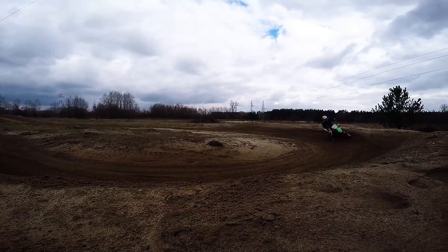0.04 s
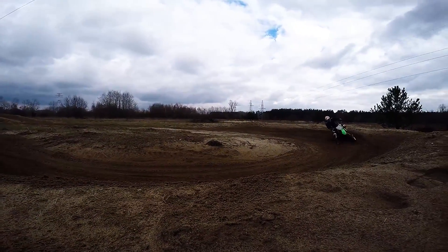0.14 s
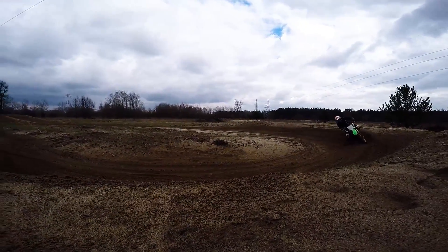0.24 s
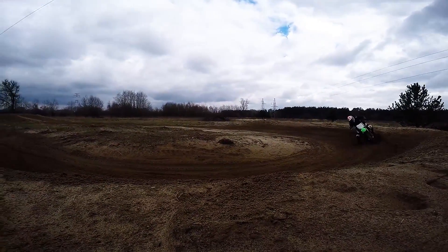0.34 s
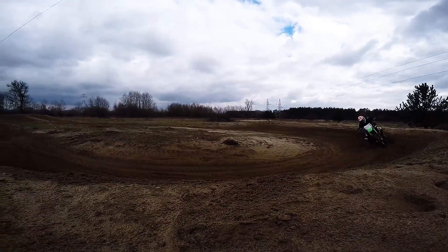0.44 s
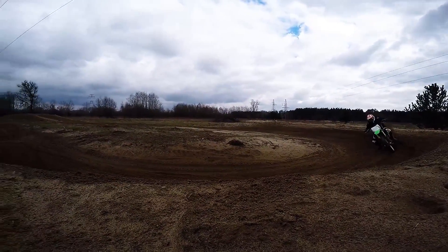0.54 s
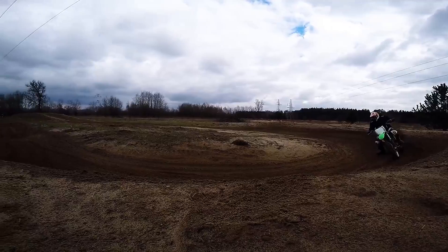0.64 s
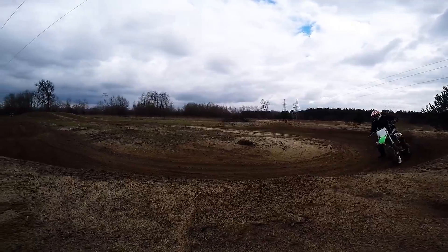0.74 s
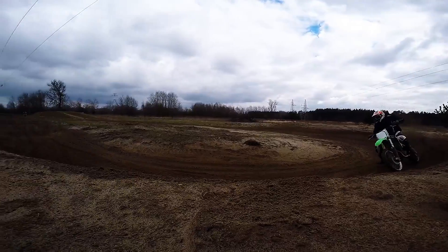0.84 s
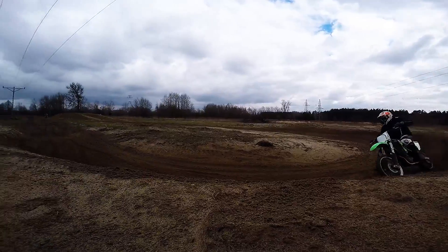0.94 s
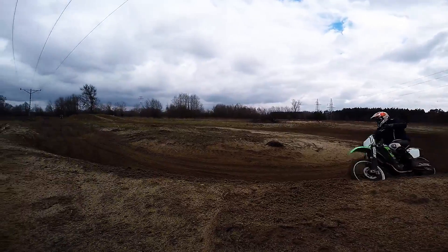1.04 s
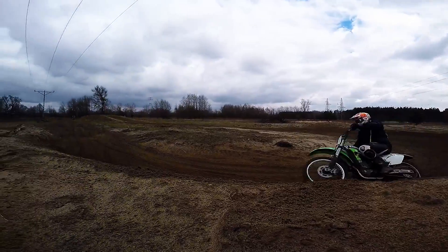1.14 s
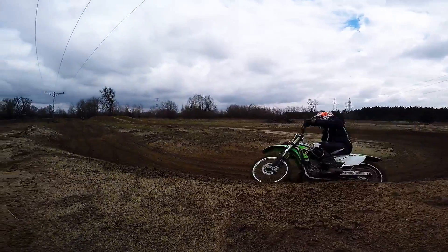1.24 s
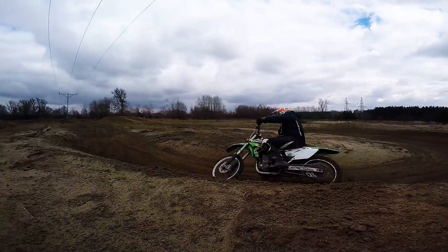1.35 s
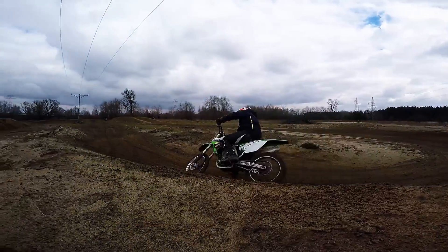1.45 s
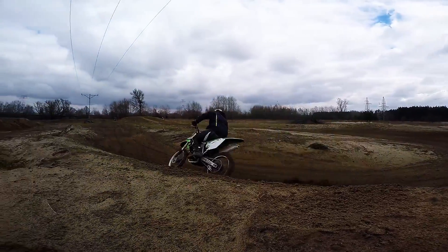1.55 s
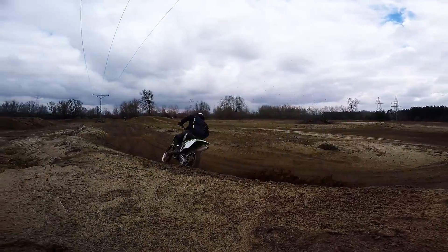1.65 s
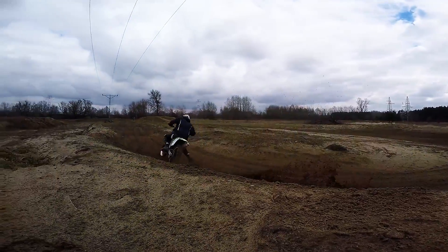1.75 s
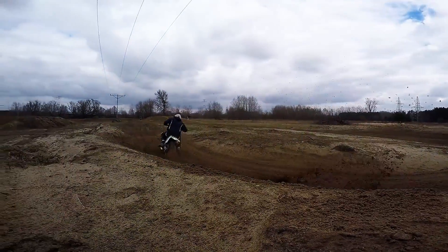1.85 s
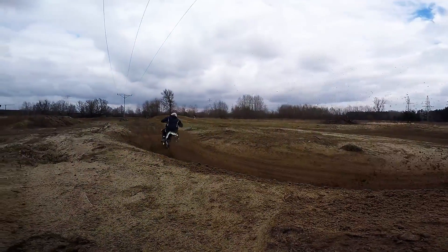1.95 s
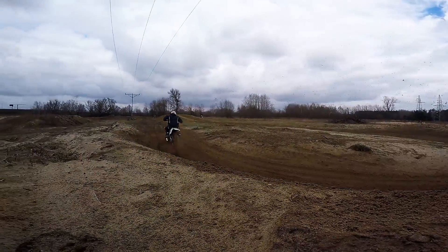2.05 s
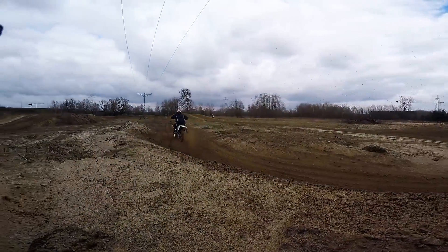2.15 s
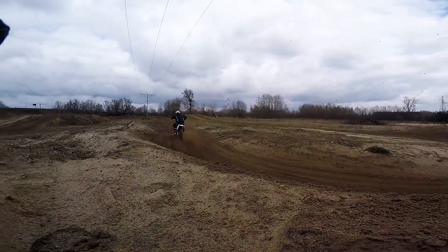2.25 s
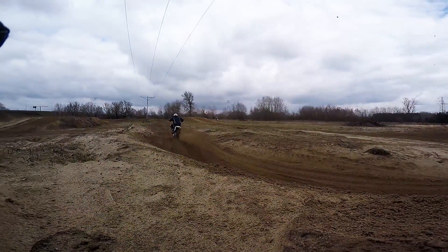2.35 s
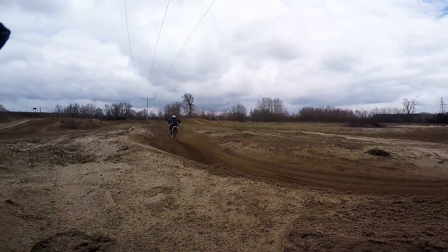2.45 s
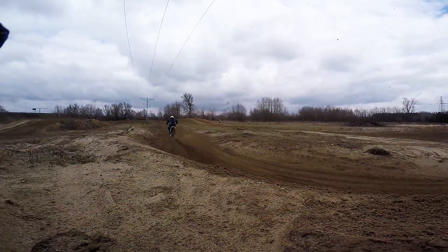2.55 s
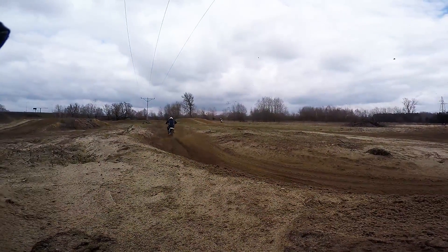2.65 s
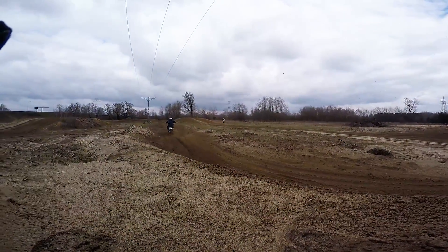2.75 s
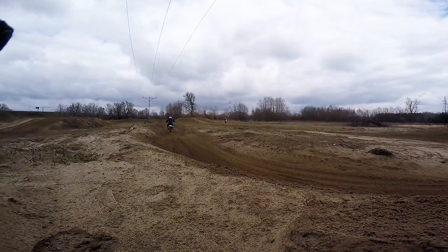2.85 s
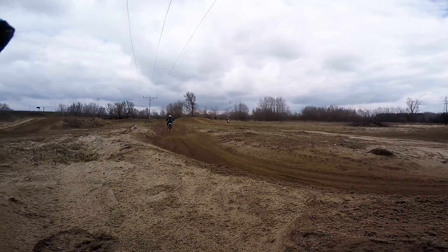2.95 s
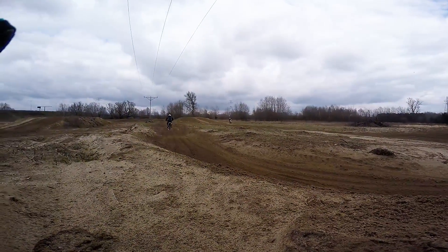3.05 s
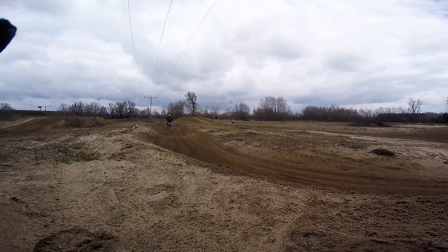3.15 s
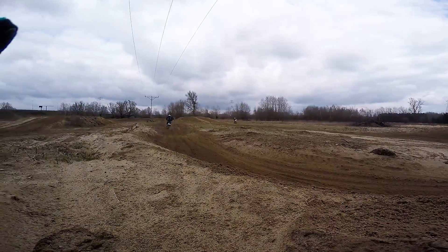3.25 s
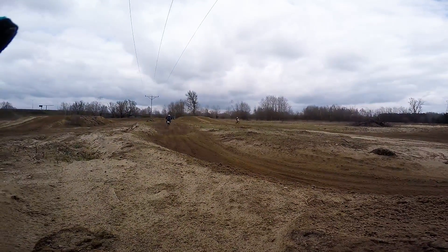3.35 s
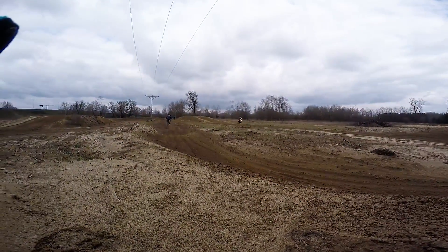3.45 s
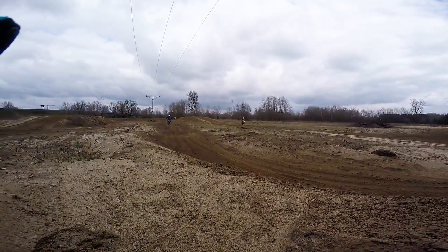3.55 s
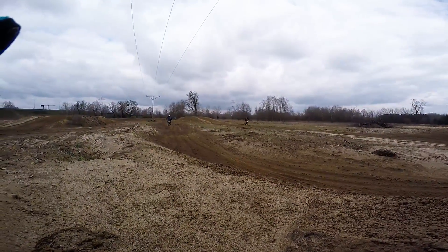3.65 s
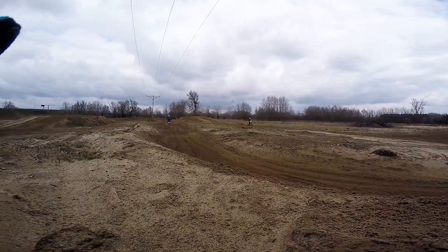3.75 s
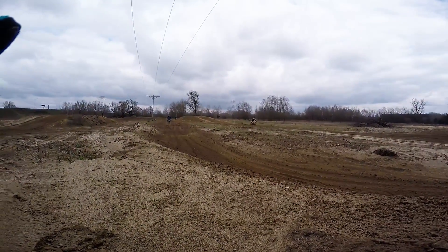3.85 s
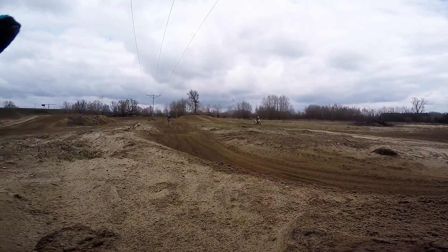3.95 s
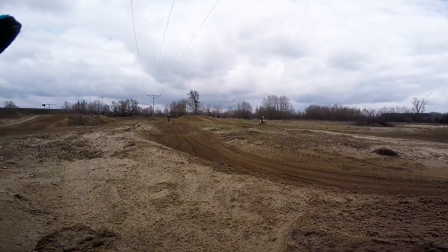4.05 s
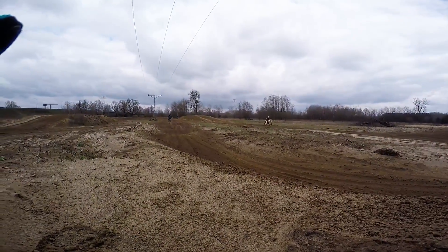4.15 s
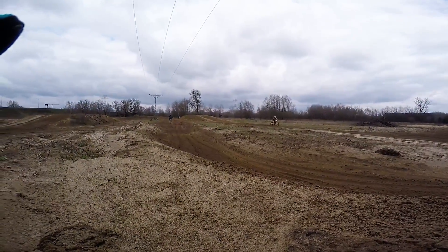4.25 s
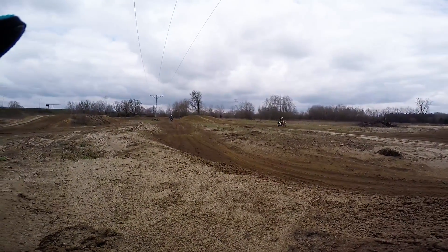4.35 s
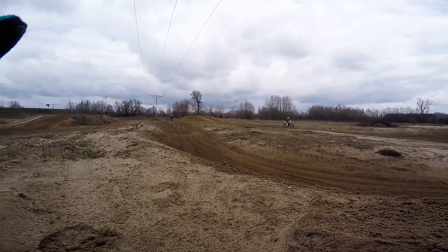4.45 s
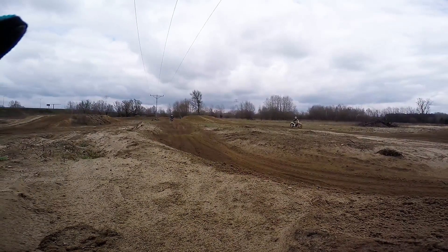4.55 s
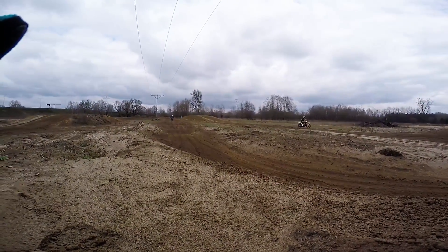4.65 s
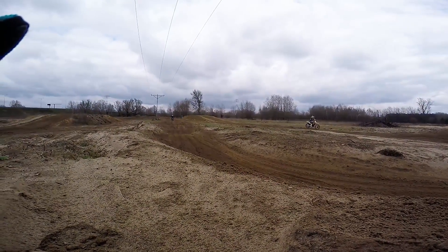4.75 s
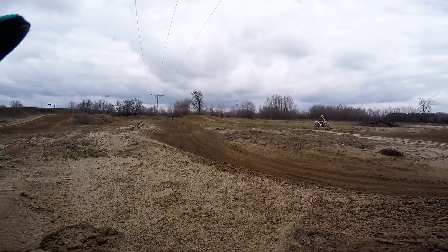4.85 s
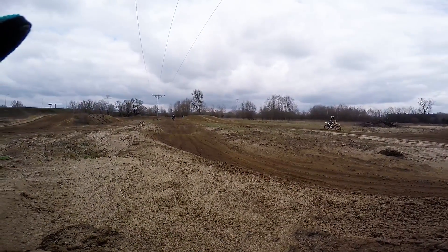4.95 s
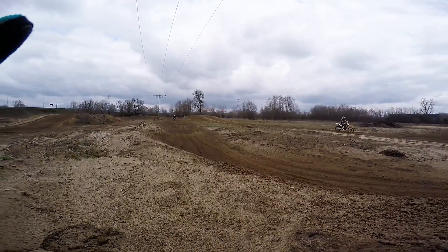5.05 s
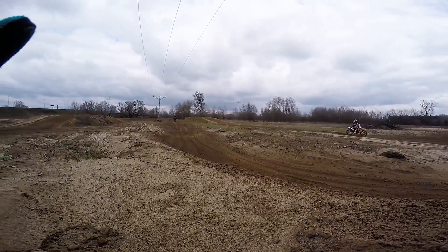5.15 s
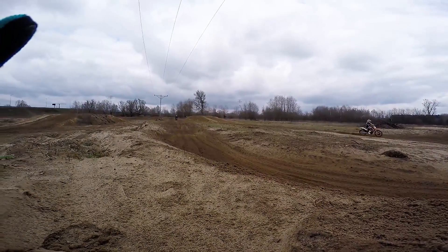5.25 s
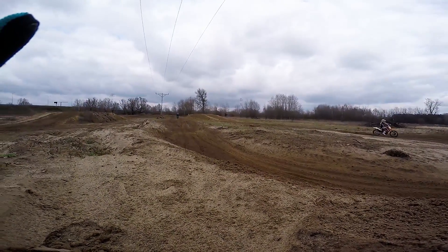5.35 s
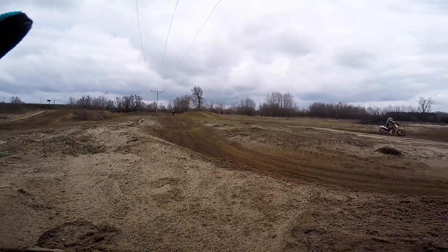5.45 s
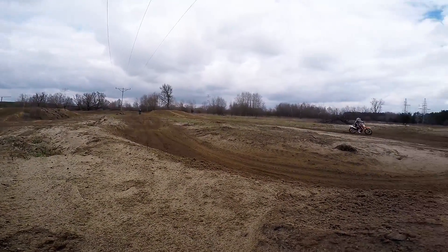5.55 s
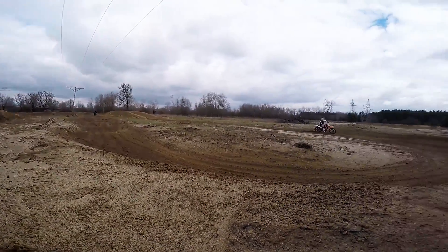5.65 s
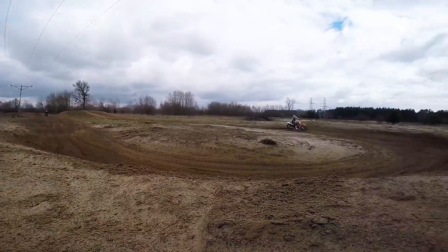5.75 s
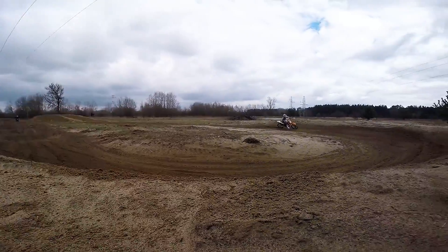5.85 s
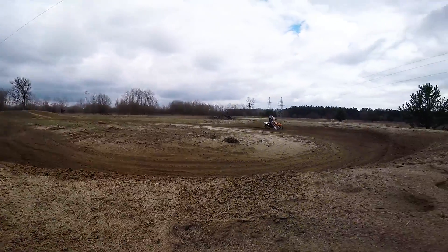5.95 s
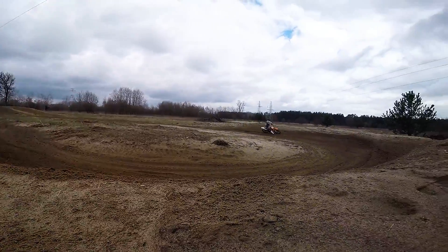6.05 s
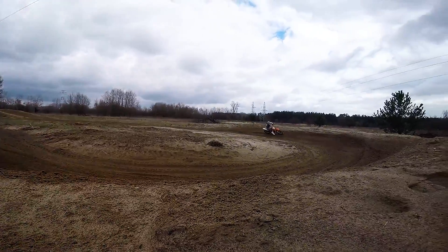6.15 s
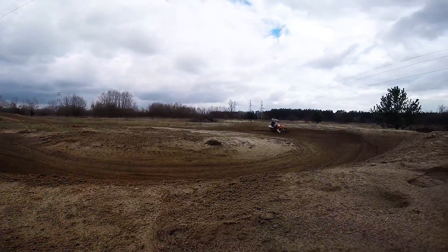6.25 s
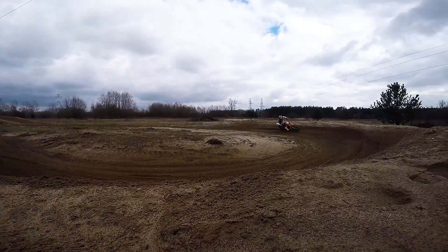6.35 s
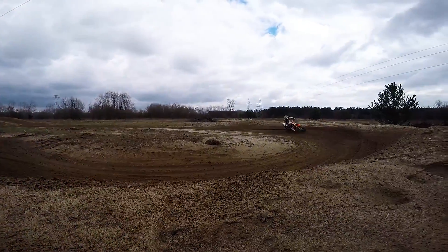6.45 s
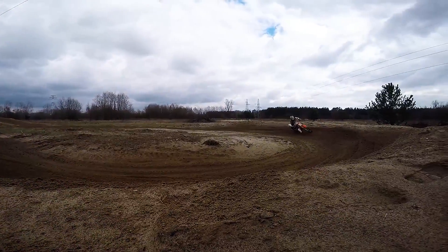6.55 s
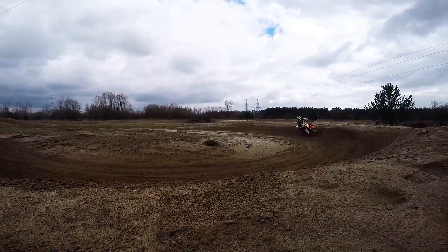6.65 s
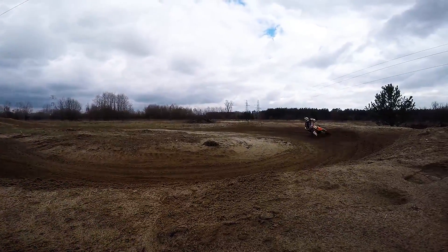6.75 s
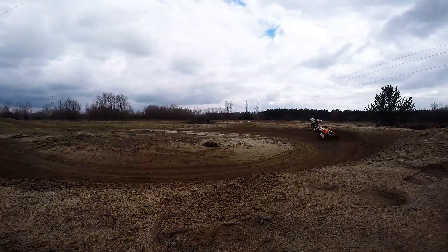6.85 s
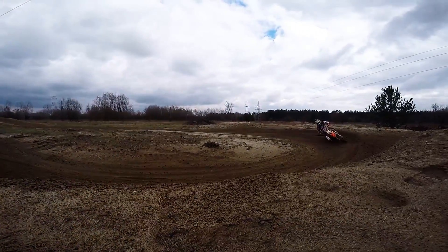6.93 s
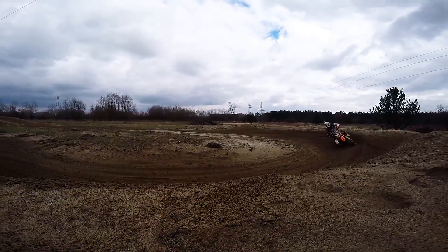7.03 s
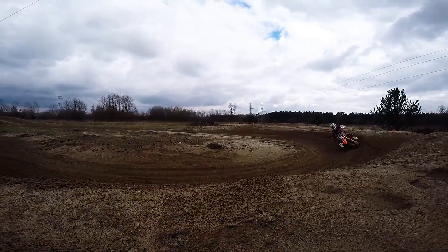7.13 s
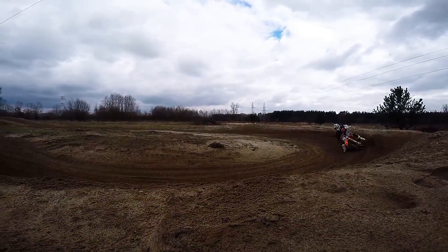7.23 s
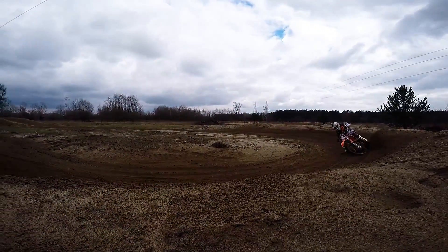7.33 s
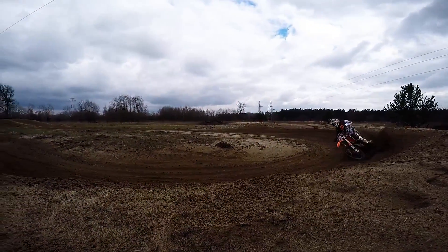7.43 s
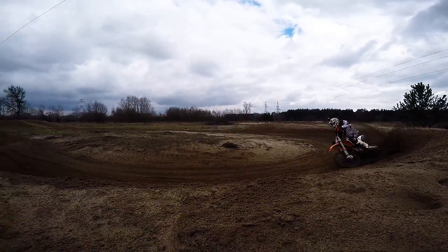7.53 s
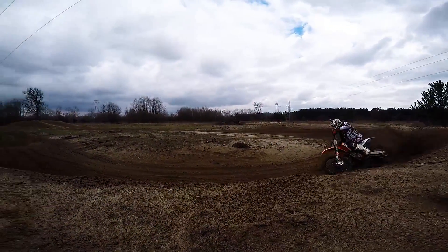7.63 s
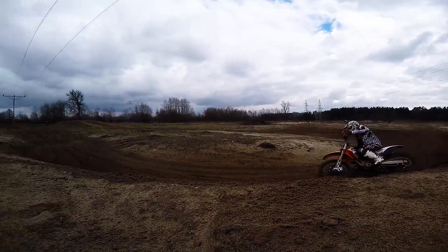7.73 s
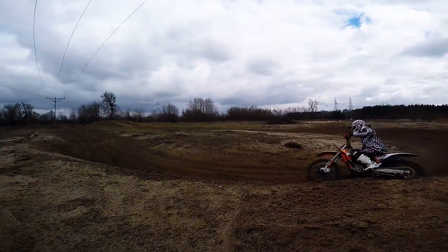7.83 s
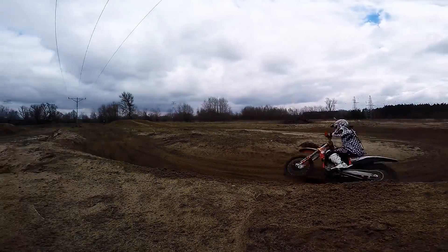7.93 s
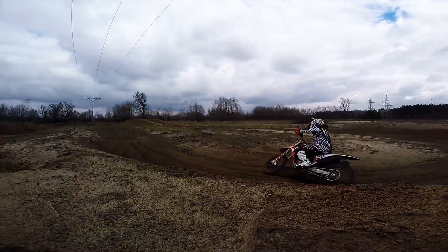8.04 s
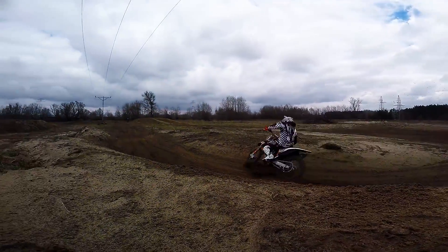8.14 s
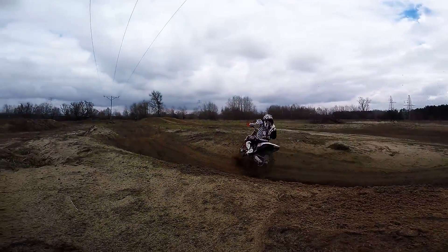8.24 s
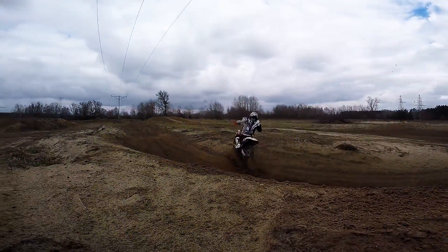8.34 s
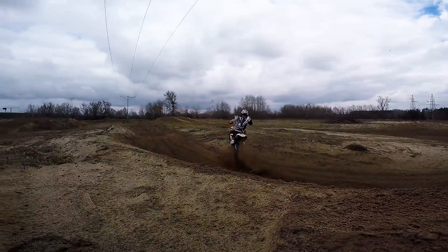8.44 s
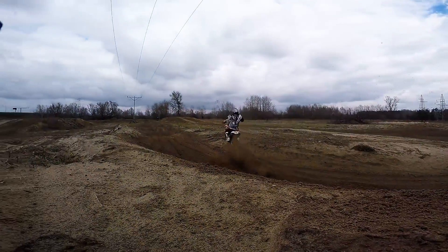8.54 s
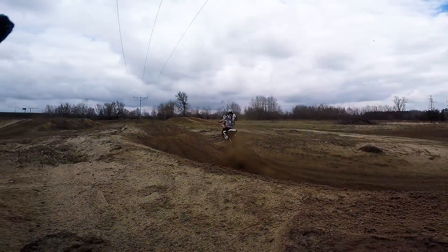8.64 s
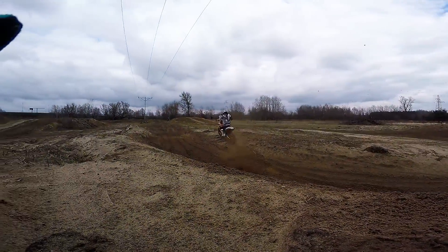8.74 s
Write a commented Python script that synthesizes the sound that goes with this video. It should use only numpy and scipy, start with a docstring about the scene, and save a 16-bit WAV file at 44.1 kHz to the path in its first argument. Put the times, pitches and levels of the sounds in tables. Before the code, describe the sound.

Two four-stroke dirt bikes roar past close by, one after the other on an open sandy track, blasting away with raspy, crackling exhaust surges.

```python
"""Two dirt bikes in a sandy bend

Two four-stroke bikes pass close by a camera, one after the other, and pull away. Head on, each is intake honk
and a noisy rush of chain, gears and tyres; tail on, every firing is a harmonic boom with a rasping burst of gas.
Surges of throttle set engine speed and loudness, and at listed moments the exhaust cracks as the load changes.
Filtered noise bursts are clods landing; pulse trains are far bikes; low noise is wind on the microphone."""
import sys
import numpy as np
from scipy import signal
from scipy.fft import rfft, irfft, next_fast_len
from scipy.io import wavfile
from scipy.ndimage import uniform_filter1d, map_coordinates

SR = 44100
rng = np.random.default_rng(int(sys.argv[2]) if len(sys.argv) > 2 else 0)


def waveform_to_disk(signal):
    """Save audio, clipped to [-1, 1], as 16-bit WAV at the path in sys.argv[1]."""
    frames = np.transpose(np.atleast_2d(signal))
    scaled = np.clip(frames, -1, 1) * 32767
    samples = np.round(scaled).astype(np.int16)
    wavfile.write(sys.argv[1], SR, samples)


N = 387638

# Throttle surges: (time [s], initial firing rate [Hz], climb [s], final firing rate [Hz], hold [s],
# full drop once eased off [dB])
FIRST_SURGES = [(0.14, 41.0, 0.27, 54.0, 0.01, 2.0), (0.66, 34.3, 0.26, 66.8, 0.08, 2.0),
                (1.35, 45.2, 0.28, 84.5, 0.02, 1.0), (1.97, 71.6, 0.23, 83.9, 0.1, 1.0),
                (2.49, 74.9, 0.13, 79.4, 0.03, 9.0), (2.79, 57.9, 0.08, 57.8, 0.08, 1.0),
                (2.96, 58.8, 0.17, 87.2, 0.17, 8.0), (3.46, 66.6, 0.19, 86.2, 0.17, 13.0),
                (3.98, 61.7, 0.15, 83.8, 0.19, 8.0), (4.39, 65.1, 0.17, 77.4, 0.11, 14.0)]
SECOND_SURGES = [(5.6, 72.0, 0.09, 74.3, 0.09, 8.0), (6.07, 62.5, 0.21, 65.1, 0.13, 18.0),
                 (6.61, 61.7, 0.17, 64.8, 0.02, 3.0), (7.02, 67.6, 0.14, 76.5, 0.01, 7.0),
                 (7.42, 54.6, 0.29, 90.9, 0.14, 1.0), (8.19, 75.4, 0.42, 87.3, 0.08, 1.0)]
# Pass of each bike at cruise rate and full throttle, before its own trims:
# (time [s], second order level [dB], third order level [dB], bark level [dB], rasp level [dB])
FIRST_PASS = [(0.0, -37.0, -62, -46.5, -53), (0.68, -35.5, -38, -37.5, -51.5),
              (0.85, -34.0, -42.5, -35, -34.5), (1.25, -31, -34, -33.5, -33),
              (1.48, -18.5, -22, -25, -15.5), (1.6, -20, -37, -33, -16), (1.85, -26.5, -33, -38.5, -25.5),
              (2.2, -25.5, -34.5, -35, -20.5), (2.36, -30.5, -38, -32.5, -27),
              (2.5, -29.5, -36, -35.5, -28.5), (3.201, -27, -31.5, -34, -25.5),
              (3.6, -30, -35.5, -39, -27.5), (4.15, -32.5, -38, -42, -29.5), (4.3, -34.5, -41.0, -41, -31),
              (4.7, -32, -40, -52, -31.5), (5.6, -53, -44, -80, -35.5)]
SECOND_PASS = [(5.6, -43.5, -58.0, -54.5, -37.5), (6.2, -36.5, -47, -45.5, -38),
               (6.75, -34.5, -49.5, -44.5, -40.5), (7.42, -36, -40.5, -43, -44), (7.7, -38, -29, -34, -24),
               (8.0, -26, -41, -33, -23.0), (8.3, -21.0, -34.5, -30.5, -18.5), (8.79, -21.5, -34, -33, -24)]
# Orientation of each bike: (time [s], facing [0 head on, 1 side on, 2 tail on])
FIRST_TURN = [(0, 0.059), (1.25, 0.14), (1.48, 0.8), (1.66, 1.17), (1.85, 1.47), (2.599, 1.77),
              (2.95, 1.78), (3.6, 1.9)]
SECOND_TURN = [(5.9, 0.017), (6.2, 0.43), (6.9, 0.17), (7.5, 0.038), (7.85, 0.29), (8.1, 0.56),
               (8.38, 1.29), (8.55, 2.33)]
# Spectrum of the exhaust rasp from the side and from behind: (frequency [Hz], relative level [dB])
FIRST_SIDE = [(900, -53), (1500, -5.5), (1900, 11), (2300, -5.5), (3000, 9.5), (3600, 3.5), (4300, 3),
              (5000, 0), (5700, -5), (6500, -4), (10000, -17), (13000, -22), (15000, -41.5)]
FIRST_TAIL = [(900, -20.5), (1400, -17.5), (1800, 2), (2100, -11), (2650, 6), (3200, -1.5), (4300, -9.5),
              (6200, -21), (6600, -14), (7300, -36), (10000, -42.5), (15000, -49)]
SECOND_SIDE = [(900, -16), (1450, -9), (1850, 8), (2280, -16), (2900, -11), (4200, -7), (4900, -14.5),
               (5600, -10.5), (6600, -23), (7600, -23.5), (9000, -27.5), (15000, -38.5)]
SECOND_TAIL = [(900, -10.5), (1450, -12), (1780, 8.5), (2200, -7.5), (2750, 2), (3400, -10), (4200, -8.5),
               (6500, -23), (7600, -26.5), (9000, -27), (15000, -32)]
# Spectra of silencer body, air box and the pipe's ring in a flare: (frequency [Hz], relative level [dB])
SILENCER_BODY = [(250, -18), (360, 5.5), (500, 1), (620, 3), (800, 1.5), (1100, 3), (1400, 4), (2000, -8.5),
                 (4000, -65)]
AIR_BOX = [(200, -9), (280, 14), (360, -1.5), (450, -19.5), (700, -7.5), (1400, -14), (3000, -60)]
PIPE_RING = [(900, -14.5), (1400, -15), (2100, -10), (2700, 9), (3500, 0.5), (4500, -11), (6600, -22.5),
             (8000, -37), (15000, -39)]
# Head-on rush of chain, gears and tyres as coloured by the camera housing's resonances:
# (frequency [Hz], relative level [dB])
HEAD_ON_RUSH = [(900, -6), (1500, -5), (1900, 6.5), (2300, -4.5), (3000, 5.5), (4100, -0.5), (4700, -12),
                (5600, -1), (6500, -16.5), (7600, -5.5), (8900, -23), (10000, -16.5), (11500, -23.5),
                (15000, -25)]
# Exhaust flares as the load changes: (time [s], level over the rasp [dB], Gaussian half length [s])
FLARES = [(1.774, -2, 0.028), (1.979, -2, 0.028), (2.94, 8, 0.053), (3.146, 2, 0.037), (3.387, 2.5, 0.047),
          (3.446, 0, 0.025), (3.788, 1.5, 0.046), (3.846, 9.5, 0.02), (4.037, 7, .03), (4.333, 7.5, 0.028),
          (4.414, 5.5, 0.038), (8.295, -3.5, 0.031)]
# Crossfade between the bikes: (time [s], second bike's share of power [0 to 1])
HANDOVER = [(5.52, 0.067), (5.66, 0.79)]
# Scattered echo, stronger the further off the bike: (time [s], level relative to direct sound [dB])
ECHO = [(0, -10), (1.6, -19), (2.95, -19), (4.5, -13), (4.9, 4), (5.9, -4), (6.2, -16), (8.3, -17)]
# Clods and stones landing: (time [s], peak level [dB], ring frequency [Hz], 60 dB decay of the noise [s])
CLODS = [(5.188, -14, 10000, 0.01), (5.1883, -21.5, 905, 0.02), (5.476, -28, 890, 0.02),
         (5.823, -36, 7000, 0.018), (6.06, -16, 3050, 0.022), (6.4096, -22.5, 3090, 0.026),
         (6.456, -16, 3340, 0.005)]
# Wind, before a fixed cut and gusts: (time [s], level [dB])
WIND = [(0.0, -55), (1.44, -43), (1.86, -69), (2.55, -49), (4.87, -43.5), (5.19, -31.5), (5.88, -40),
        (7.64, -41), (8.57, -52), (8.79, -51)]
# Shoves of air: (time [s], sine amplitude before decay [dB], frequency [Hz])
BUFFETS = [(5.192, -12, 31), (5.482, -21, 38)]
# Far bikes: (central firing rate [Hz], level before swells [dB])
FAR_BIKES = [(74.54, -48), (57, -46.5)]
# Spectrum of the open-air murmur: (frequency [Hz], relative level [dB])
MURMUR = [(20, 12.5), (60, 6), (150, 6), (300, -17.5), (600, -20.5), (1500, -27), (3000, -13),
          (7000, -20.5), (15000, -54)]
# Spectra of wind and far drone: (frequency [Hz], relative level [dB])
WIND_COLOUR = [(16, -4.5), (35, 4.0), (60, -23), (120, -6.5), (400, -89), (2000, -112)]
DRONE_COLOUR = [(70, -8), (140, -1.5), (200, -2.5), (320, -17.5), (700, -37.5), (4000, -51.0)]

SAG_HZ_PER_S = 9  # sand drags the held firing rate down
FLYWHEEL_S, THROTTLE_S = 0.0524, 0.042  # inertia averaging window; twist of the grip
CRUISE_HZ = 80  # reference firing rate
BOOM_DB_PER_OCTAVE, BARK_DB_PER_OCTAVE, RASP_DB_PER_OCTAVE = 9, 6.5, 0.5  # gain with firing rate
BOOM_DROP, RASP_DROP = 0.56, 0.47  # shares of the throttle drop [dB] followed; the bark follows it all
HONK_SIDE, HONK_HOLD = 0.55, 0.81  # intake gain side on; share of the throttle drop [dB] given back
FLARE_BODY = 0.36  # share of a flare that swells the whole rasp
GROUND_S, GROUND_DB = 0.000864, -10  # central lag and level of the ground reflection
BOUNCE = 0.18  # swing of the lag's natural logarithm over the ruts
TOP_HZ = 15600  # upper band limit


def riders():
    """Superposition at constant power: the first bike fades behind the rise as the second comes in."""
    first_engine = throttle(FIRST_SURGES, end_s=4.9, end_hz=57)
    second_engine = throttle(SECOND_SURGES, end_s=8.9, end_hz=89)
    first = bike(first_engine, FIRST_PASS, FIRST_TURN, FIRST_SIDE, FIRST_TAIL,
                 blur=0.3, rough=0.8, decay=0.0056, first_db=-6.5, fourth_db=-3.5,
                 boom_db=4.0, bark_db=0.0, intake_db=-5.5, rasp_db=0.5, rush_db=-0.6)
    second = bike(second_engine, SECOND_PASS, SECOND_TURN, SECOND_SIDE, SECOND_TAIL,
                  blur=0, rough=0.87, decay=0.0058, first_db=-3.5, fourth_db=-25,
                  boom_db=5, bark_db=4.0, intake_db=1, rasp_db=0.5, rush_db=-0.37)
    second_share, = curves(HANDOVER)
    return blend(first, second, second_share)


def bike(engine, passing, turn, side, tail, blur, rough, decay,
         first_db, fourth_db, boom_db, bark_db, intake_db, rasp_db, rush_db):
    """Directivity: a single cylinder's sources are weighted by the way the bike faces."""
    rate, drop_db = engine
    two_db, three_db, bark_level_db, rasp_level_db = levels(passing, rate, drop_db)
    facing, = curves(turn)
    head_on, side_on, tail_on = [np.cos(np.pi / 2 * np.minimum(abs(facing - k), 1)) for k in range(3)]
    grip = .01 * wobble(25)  # the rear wheel grips and slips [cycles]
    cycles = np.cumsum(rate) / SR + grip
    order_db = [two_db + first_db + 5 * head_on, two_db, three_db, three_db + fourth_db]
    low = amp(boom_db) * boom(cycles, order_db)
    body = bark(cycles, rate, .12 + blur * head_on) * amp(bark_db - head_on)
    intake_gain = amp(intake_db + HONK_HOLD * drop_db) * (head_on + HONK_SIDE * side_on)
    middle = amp(bark_level_db) * (ground(body) + intake_gain * honk(cycles))
    gas = amp(rasp_db) * rasp(cycles, rate, side_on, tail_on, side, tail, rough, decay)
    oncoming = amp(rush_db) * head_on * rush(cycles)
    return low + middle + amp(rasp_level_db) * (gas + oncoming)


def throttle(surges, end_s, end_hz):
    """Inertia: each surge climbs, holds and eases off; returns firing rate and throttle drop in dB."""
    t = np.arange(N) / SR
    knots, drop_db = [], np.zeros(N)
    reopens = [row[0] for row in surges[1:]] + [N / SR]
    for (start, low, climb, high, hold, db), reopen in zip(surges, reopens):
        shut = min(start + climb + hold, reopen)
        top = min(start + climb, shut)
        knots += [(start, low), (top, high), (shut, high - SAG_HZ_PER_S * hold)]
        inside_s = np.minimum(t - shut, reopen - t)
        drop_db += db * np.clip(inside_s / THROTTLE_S + .5, 0, 1)
    rate, = curves(knots + [(end_s, end_hz)])
    return uniform_filter1d(rate, int(FLYWHEEL_S * SR)), drop_db


def levels(passing, rate, drop_db):
    """Source strength: order, bark and rasp levels rise with firing rate and fall as the throttle shuts."""
    two_db, three_db, bark_db, rasp_db = curves(passing)
    octaves = np.log2(rate / CRUISE_HZ)
    boom_effort_db = BOOM_DB_PER_OCTAVE * octaves - BOOM_DROP * drop_db
    bark_effort_db = BARK_DB_PER_OCTAVE * octaves - drop_db
    rasp_effort_db = RASP_DB_PER_OCTAVE * octaves - RASP_DROP * drop_db
    return two_db + boom_effort_db, three_db + boom_effort_db, bark_db + bark_effort_db, rasp_db + rasp_effort_db


def boom(cycles, order_db):
    """Harmonic series: the silencer passes the lowest firing orders as tones, lagging more each octave."""
    total = np.zeros(N)
    for k, db in enumerate(order_db, 1):
        phase = 2 * np.pi * k * (cycles - .14) + 0.74 - 2 * np.log2(k)
        total += amp(db + 0.92 * wobble(35)) * np.cos(phase)
    return total


def bark(cycles, rate, blur_share):
    """Body resonance: an even beat of pulses, blurred by gas noise, is shaped by the silencer."""
    puffs = blasts(cycles, rate, rise=0.0016, decay=0.0038, leak=0.3, scatter_db=3.0)
    beats = blend(pulses(cycles, scatter_db=.8, smear=.002), puffs, blur_share)
    return coloured(beats, SILENCER_BODY)


def honk(cycles):
    """Cavity resonance: intake pulses, a third of a cycle from the exhaust, excite the air box."""
    return coloured(pulses(cycles + 1 / 3, scatter_db=1.5, smear=0.0022), AIR_BOX)


def rasp(cycles, rate, side_on, tail_on, side, tail, rough, decay):
    """Shock and jet noise: each firing is a steep front with a turbulent burst; flares crack harder."""
    jet = blasts(cycles, rate, rise=.0005, decay=decay, leak=.08, scatter_db=1.5)
    front = chambers(pulses(cycles, scatter_db=2.2, smear=0.001735), depth=.75, spacing=0.000715)
    gas = blend(front, jet, rough)
    steady = side_on * coloured(gas, side) + tail_on * coloured(gas, tail)
    flare = flares()
    bang = blasts(cycles, rate, rise=0.00024, decay=.002, leak=0.0083, scatter_db=2)
    crack = coloured(blend(front, bang, 0.78), PIPE_RING)
    return (1 + FLARE_BODY * flare) * steady + flare * crack


def flares():
    """Transient excitation: the gain of the cracking swells and dies within a few firings."""
    t = np.arange(N) / SR
    return sum(amp(db) * np.exp(-((t - s) / length) ** 2) for s, db, length in FLARES)


def rush(cycles):
    """Amplitude modulation: noise rattles once a crank turn and is coloured by the camera housing."""
    rattle = amp(1.6 * np.cos(4 * np.pi * cycles) + 2.15 * wobble(300))  # two crank turns a firing cycle
    return coloured(rattle * noise(), HEAD_ON_RUSH)


def pulses(cycles, scatter_db, smear):
    """Dispersion: one pressure pulse a cycle, its treble delayed by up to smear seconds in the pipe."""
    at = np.interp(np.arange(1, int(cycles[-1]) + 1), cycles, np.arange(N))
    taps = at.astype(int)[:, None] + np.arange(-7, 9)
    offset = taps - at[:, None]
    shape = np.sinc(offset) * np.sinc(offset / 8)  # windowed sinc places pulses between samples
    sizes = amp(scatter_db * rng.standard_normal((1000, 1)))[:len(at)]
    train = np.bincount(np.clip(taps, 0, N - 1).ravel(), (sizes * shape).ravel(), N)
    return unit(filtered(train, lambda hz: np.exp(-2j * np.pi * smear * (np.hypot(hz, 2500) - 2500))))


def blasts(cycles, rate, rise, decay, leak, scatter_db):
    """Turbulence: noise bursts as the exhaust valve opens each cycle, over a weak steady flow."""
    age = cycles % 1 / rate  # seconds since the valve opened
    sizes = amp(scatter_db * rng.standard_normal(1000))[cycles.astype(int) % 1000]
    gate = (1 - np.exp(-(age / rise) ** 2)) * np.exp(-(age / decay) ** 2)
    return unit((sizes * gate + leak) * noise())


def chambers(x, depth, spacing):
    """Phase dispersion: the silencer's chambers split each pulse into close copies spacing seconds apart."""
    return filtered(x, lambda hz: np.exp(1j * depth * np.sin(2 * np.pi * hz * spacing)))


def ground(x):
    """Comb filtering: a reflection off the dirt makes notches that wander as the bike bounces."""
    n = np.arange(N)
    lag = GROUND_S * SR * np.exp(BOUNCE * wobble(3))
    reflection = amp(GROUND_DB) * np.interp(n - lag, n, x)
    return (x + reflection) / np.hypot(1, amp(GROUND_DB))


def field(x, t60):
    """Diffuse scattering: banks and bushes return a dull echo that outweighs direct sound when set high."""
    t = np.arange(SR // 2) / SR
    echo = rng.standard_normal(len(t)) * amp(-60 * t / t60) * (t > .008)
    wet = signal.fftconvolve(x, echo / np.linalg.norm(echo))[:N]
    dull = filtered(wet, lambda hz: hz / (hz + 300) / (1 + (hz / 7000) ** 2))
    send = amp(curves(ECHO)[0])
    return (x + send * dull) / np.hypot(1, send)


def clods():
    """Impact: landing dirt is a decaying noise burst through two passes of a broad resonance."""
    out, t = np.zeros(N + SR), np.arange(SR // 10) / SR
    for s, db, hz, t60 in CLODS:
        crack = rng.standard_normal(len(t)) * amp(-60 * t / t60)
        ring = signal.iirpeak(min(hz, TOP_HZ), np.clip(hz / 3000, .35, 1.5), fs=SR)
        once = signal.lfilter(*ring, crack)
        hit = signal.lfilter(*ring, once)
        out[round(s * SR):][:len(t)] += amp(db) * hit / abs(hit).max()
    return out[:N]


def wind():
    """Pressure fluctuation: a gusting low rumble, and damped sine shoves that swing the diaphragm."""
    level_db, = curves(WIND)
    gust_db = 1.4 * wobble(4)
    out = amp(level_db - 2.0 + gust_db) * coloured(noise(), WIND_COLOUR)
    for s, db, hz in BUFFETS:
        age = np.maximum(np.arange(N) / SR - s, 0)
        out -= amp(db) * np.sin(2 * np.pi * hz * age) * np.exp(-(age / 0.027) ** 2)
    return out


def distance(air_db):
    """Incoherent background: far bikes drone as dull pulse trains over the open-air murmur."""
    out = amp(air_db) * coloured(noise(), MURMUR)
    for rate, db in FAR_BIKES:
        cycles = np.cumsum(rate * np.exp(.09 * wobble(3))) / SR
        drone = coloured(pulses(cycles, scatter_db=2.0, smear=0.0018), DRONE_COLOUR)
        swell_db = 1.8 * wobble(5)
        out += amp(db + swell_db) * drone
    return out


def amp(db):
    """Logarithmic level: decibels to gain."""
    return 10 ** (np.asarray(db) / 20)


def unit(x):
    """Root-mean-square normalisation: scale to rms 1."""
    return x / np.sqrt(np.mean(x ** 2) + 1e-20)


def blend(a, b, share):
    """Addition of powers: mix two unrelated sounds, b having the given share of the power."""
    share = np.clip(share, 0, 1)
    return np.sqrt(1 - share) * a + np.sqrt(share) * b


def noise():
    """White noise: independent random samples."""
    return rng.standard_normal(N)


def wobble(rate):
    """Slow fluctuation: a smooth random curve with rate knots a second."""
    knots = rng.standard_normal(int(N * rate / SR) + 4)
    return map_coordinates(knots, [np.arange(N) * rate / SR])


def curves(rows):
    """Linear interpolation: one value per sample for each column after the time."""
    s, *cols = np.transpose(rows)
    return [np.interp(np.arange(N) / SR, s, c) for c in cols]


def filtered(x, response):
    """Convolution theorem: multiply the spectrum by a complex response of frequency."""
    m = next_fast_len(N + SR // 2)
    return irfft(rfft(x, m) * response(np.fft.rfftfreq(m, 1 / SR)), m)[:N]


def coloured(x, points, size=8192):
    """Minimum-phase filtering: shape x causally by (Hz, dB) points and scale to rms 1."""
    f, db = np.transpose(points)
    hz = np.fft.rfftfreq(size, 1 / SR) + 1
    skirt_db = 24 * np.minimum(np.log2(hz / f[0]), 0)  # 24 dB an octave below the first point
    curve_db = np.interp(np.log(hz), np.log(f), db) + skirt_db
    cepstrum = irfft(np.log(amp(curve_db) + 1e-5))
    # folding the cepstrum onto positive time makes the filter causal
    cepstrum[1:size // 2] *= 2
    cepstrum[size // 2 + 1:] = 0
    impulse = irfft(np.exp(rfft(cepstrum)))
    return unit(signal.fftconvolve(x, impulse)[:N])


def scene():
    """Superposition: every source adds at one microphone."""
    return (field(riders(), t60=0.97) + clods() + wind() + distance(air_db=-48.5))[None]


def record(dry):
    """Saturation and band limiting: the highest peaks are rounded, then all above TOP_HZ is removed."""
    rounded = dry[0] / (1 + (dry[0] / .95) ** 6) ** (1 / 6)
    return filtered(rounded, lambda hz: hz < TOP_HZ)[None]


dry = scene()
out = record(dry)
waveform_to_disk(out)
```